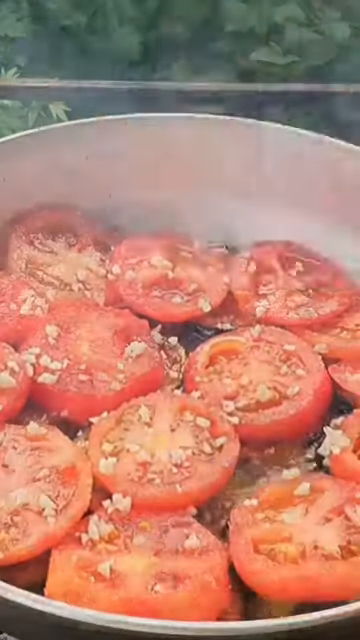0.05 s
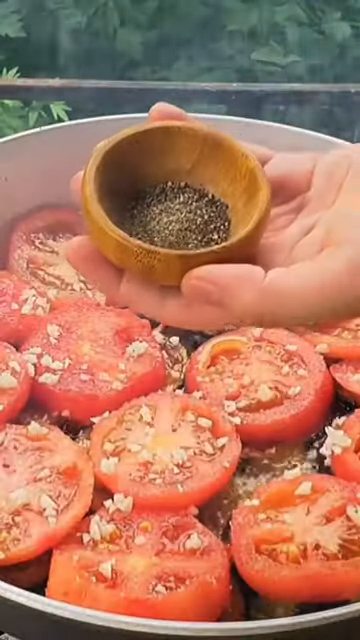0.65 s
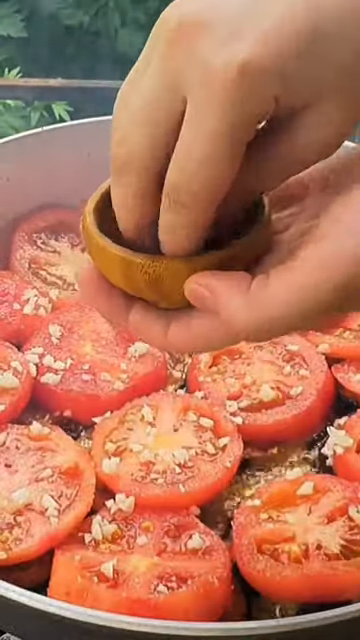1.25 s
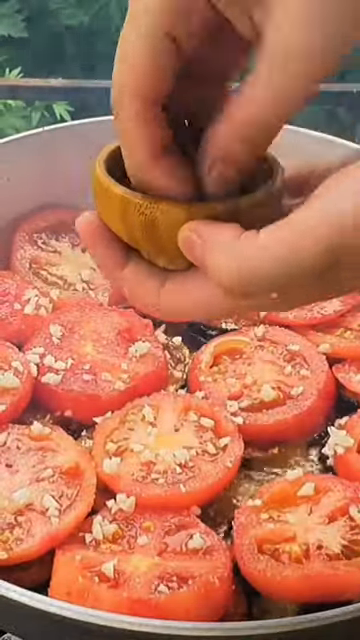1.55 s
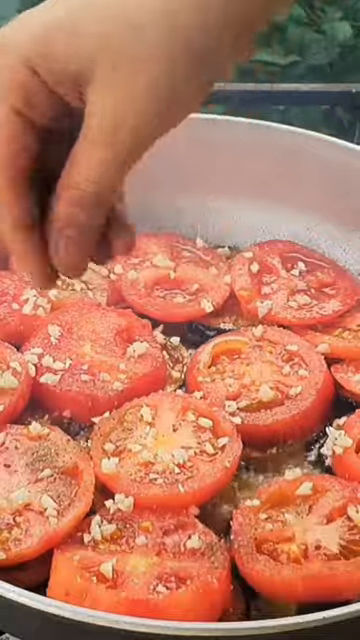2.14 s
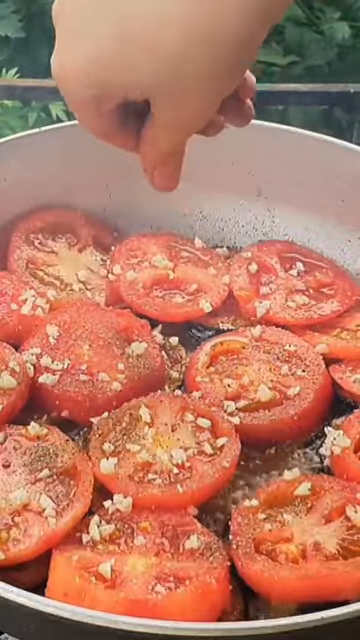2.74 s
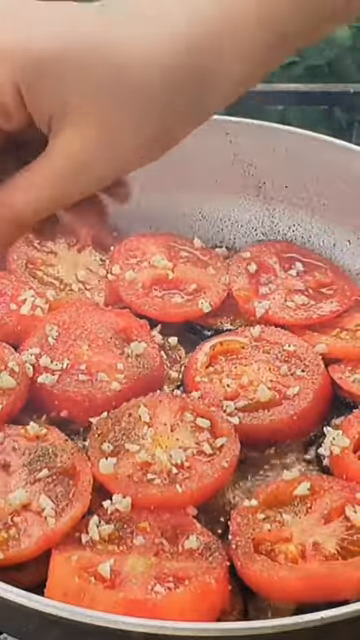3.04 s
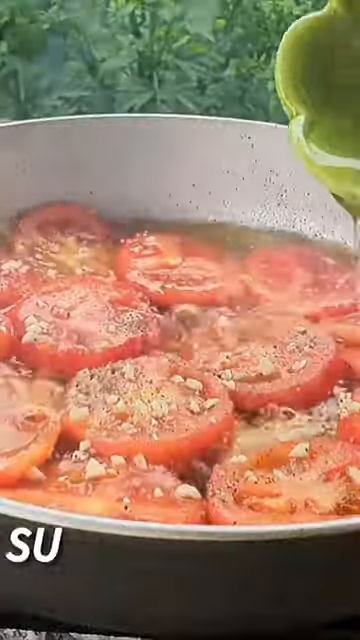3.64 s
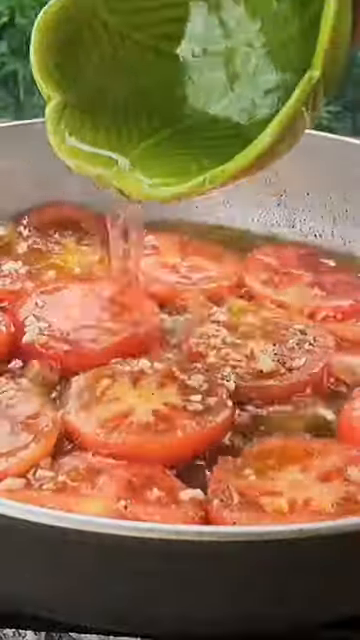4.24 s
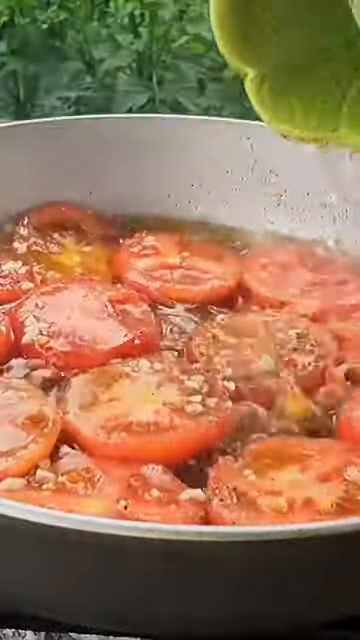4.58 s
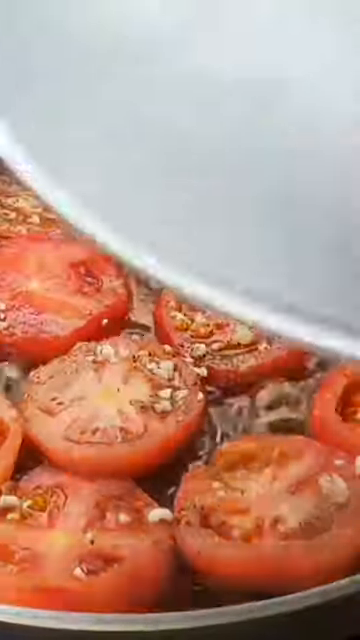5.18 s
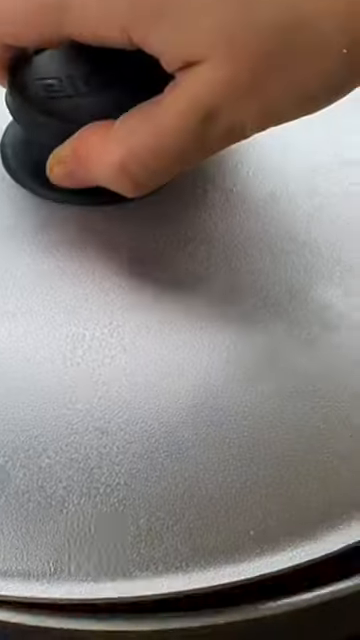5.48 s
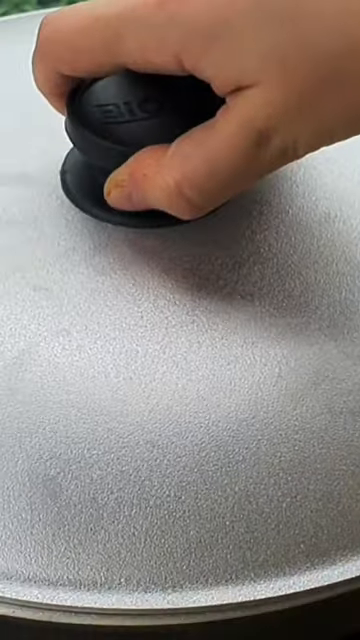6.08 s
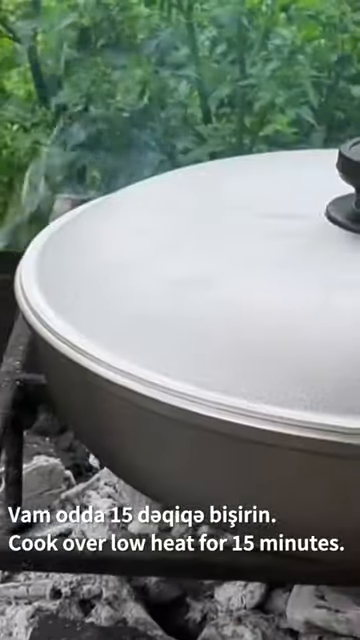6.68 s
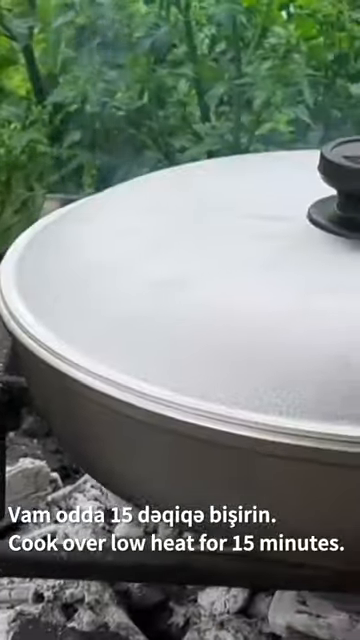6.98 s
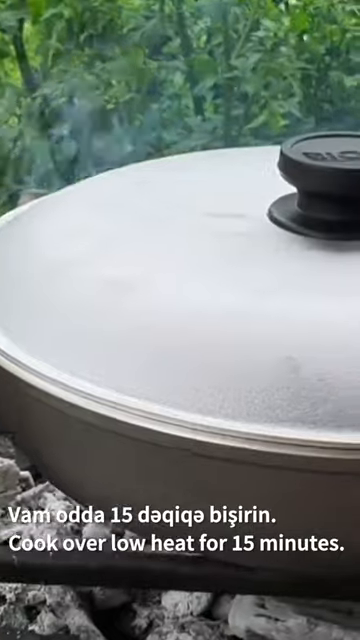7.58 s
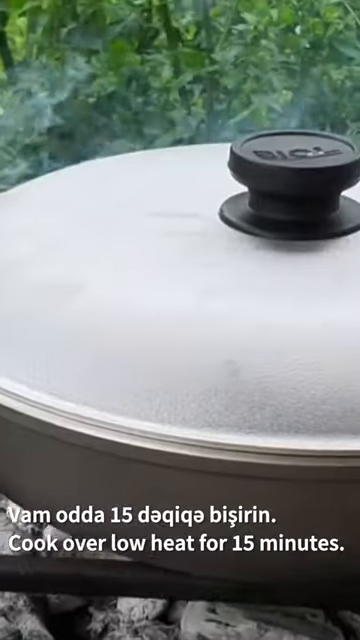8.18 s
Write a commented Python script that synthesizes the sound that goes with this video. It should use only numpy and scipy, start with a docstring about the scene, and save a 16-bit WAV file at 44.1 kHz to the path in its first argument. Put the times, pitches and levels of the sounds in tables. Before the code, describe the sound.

Tomato slices sizzle and pop loudly in hot oil, close to the microphone. Water is poured in and boils up with a hissing roar, then settles to a soft, spitting simmer. A metal lid knocks on the rim, scrapes across and drops into place with a thin ring. Muffled bubbling continues quietly under it, with faint birds, insects and a low rumble of air in the garden.

```python
"""Tomato slices fry in a wide pan over embers in a garden: steam bubbles burst in the hot oil.
Water is poured in and boils up with a roar, then the pan calms to a simmer.
A metal lid knocks on the rim, slides across and drops into place; the sauce bubbles under it.
Behind it, birds call, insects rub their wings and a draught rumbles around the fire."""
import sys
import numpy as np
from scipy import signal
from scipy.fft import rfft, irfft, next_fast_len
from scipy.io import wavfile
from scipy.ndimage import map_coordinates

SR = 44100
rng = np.random.default_rng(int(sys.argv[2]) if len(sys.argv) > 2 else 0)


def generate_wav(signal):
    """Clip the signal to [-1, 1] and save it as 16-bit WAV at the path in sys.argv[1]."""
    frames = np.transpose(np.atleast_2d(signal))
    scaled = np.clip(frames, -1, 1) * 32767
    pcm = np.round(scaled).astype(np.int16)
    wavfile.write(sys.argv[1], SR, pcm)


N = 366912

TOP_HZ = 15700  # upper edge of the sound
LID_SHUT_S = 6.03
# the gritty tone of lid against rim: (frequency [Hz], level [dB])
GRIT_TONE = [(500, -19.5), (1080, 7), (1350, 2.5), (1900, -2), (2500, 6.5), (3100, -9.5), (4300, -9.5),
             (6500, -9), (8000, -14), (12000, -18), (15600, -27)]


def frying():
    """Juice flashes to steam in the oil: dry ticks, wet ringing bubbles, a fine fizz and loud pops."""
    # the largest steam bubbles bursting: (time [s], level [dB])
    big_pops = [(0.0742, -6.5), (0.2349, -4), (0.4923, -4), (0.5676, -1), (0.637, -1), (1.076, 1.5),
                (1.2565, -0.5), (1.4385, 0.5), (1.5713, 2), (1.6928, -0.5), (1.923, 1), (2.0213, -1.5),
                (2.346, -3), (2.362, -0.5)]
    # the tone of sizzling oil: (frequency [Hz], level [dB])
    oil_tone = [(150, -27.5), (280, -23.5), (450, -26), (560, -16), (660, -12), (850, -14), (1100, -14),
                (1500, -11.5), (1900, -6.5), (2500, -4), (3400, 0), (5000, -5.5), (7500, -6.5),
                (11000, -12), (15600, -16)]
    t = np.arange(N) / SR
    build_s, end_s, flurry_s, pop_hz = 0.72, 3.035, 0.028, 3397
    # the sizzle builds up, then holds until the water comes
    heat = amp(-15.5 - 3.5 * np.maximum(1 - t / build_s, 0)) * held(0, end_s, fall_s=0.54)
    clumps = amp(1.2 * wobble(260) + 0.85 * wobble(45.1) + 0.39 * wobble(14))
    ticks = bubbles(0, 3.3, count=9000, life_s=0.00021, spread_db=4)
    wet = bubbles(0, 3.3, count=1500, life_s=0.0038, spread_db=3, high_hz=5203, samples=480)
    sizzle = colour(clumps * (ticks + amp(-6.5) * wet + noise()), oil_tone)
    soft_pops = scattered(0, end_s, count=20, db=-7.5, spread_db=3)
    all_pops = [(s, db, pop_hz * np.exp(rng.normal(0, 0.063))) for s, db in [*big_pops, *soft_pops]]
    pops = bursts(all_pops, ring_s=0.016, spray_db=-10, spray_s=0.018, spray_width_hz=4200)
    # each big pop sets off a flurry of small bubbles
    flurries = sum((t > s) * np.exp(-np.abs(t - s) / flurry_s) for s, _ in big_pops)
    small = bubbles(0, 3.3, count=1400, life_s=0.005, spread_db=2.5, low_hz=1793, high_hz=4730,
                    samples=480)
    spatter = amp(-2.8) * heat * flurries * unit(small) + amp(-2) * pops
    # the pops and flurries carry no bass
    return heat * sizzle + filtered(spatter, lambda hz: 1 - 1 / (1 + (hz / 900) ** 4))


def pouring():
    """Water meets hot oil: a dense boil makes the pan hum, under a hiss of bursting steam bubbles."""
    # the tones of the boil and the steam: (frequency [Hz], level [dB])
    boil_tone = [(41, -47), (70, -26.5), (102, 1.5), (171, -13.5), (253, -2), (308, -0.5), (436, 0),
                 (677, -8), (741, 0), (930, 1.5), (2240, 0.5), (2600, 4), (3380, -43), (5720, -120)]
    steam_tone = [(1500, -35), (2300, -13.5), (2750, -2), (3300, -2.5), (4300, -0.5), (5200, 0.5),
                  (6500, -2), (8000, -2), (10500, -6), (13000, -6), (15600, -5)]
    # where the pan, fine bubbles and coarse bubbles ring: (pitch [Hz], width [Hz], level [dB])
    pan_peaks = [(95, 30.3, -17), (211, 27, 3.5), (251, 24.3, 9), (444, 185, 7), (947, 90, 1),
                 (1140, 210, 6), (1620, 260, 3)]
    fine_peaks = [(5330, 1500, 0)]
    coarse_peaks = [(1170, 340, -4.5), (2820, 420, 1.5)]
    t = np.arange(N) / SR
    full_s, end_s, trickle_s = 3.226, 4.887, 0.14
    # the steam weakens as the pan cools; it dies with the boil as the stream of water thins out
    flow = np.clip((end_s - t) / trickle_s, 0, 1)
    boil_gain = amp(-21) * flow * held(full_s, end_s, rise_s=0.48)
    steam_gain = amp(-9.5) * flow ** 1.25 * held(full_s, end_s, rise_s=0.6, sag_db_per_s=2.5)
    rolling = bubbles(3, 5, count=1600, life_s=0.0044, spread_db=1.5, high_hz=3190, samples=600)
    froth = bubbles(3, 5, count=4000, life_s=0.0057, spread_db=2, samples=400) + amp(3) * noise()
    boil = amp(-1.5) * colour(rolling + amp(6.5) * noise(), boil_tone)
    boil += amp(-1) * resonate(noise(), pan_peaks)
    # as the water floods and cools the pan, the bubbles grow and the hiss deepens
    flood = np.interp(t, [3.3, 4.1], [0, 1])
    fine = amp(-8.5) * (1 - flood) * resonate(noise(), fine_peaks)
    coarse = amp(-9.5) * flood * resonate(noise(), coarse_peaks)
    steam = (colour(froth, steam_tone) + fine + coarse) * amp(0.97 * wobble(60))
    return boil_gain * boil * amp(0.85 * wobble(35)) + steam_gain * steam


def simmering():
    """The cooled pan ticks and spits softly; the lid coming down makes the bubbling sound hollow."""
    # the tone of simmering sauce: (frequency [Hz], level [dB])
    sauce_tone = [(53, -39), (90, 0), (237, -9), (270, -4), (434, -21), (493, -10.5), (727, -15),
                  (1030, -9.5), (1720, -14.5), (3430, -21.5), (12500, -28), (15500, -33)]
    # where the gap under the lid rings: (pitch [Hz], width [Hz], level [dB])
    gap_peaks = [(1710, 130, 0)]
    # the loudest spitting droplets: (time [s], level [dB], pitch [Hz])
    droplets = [(4.9776, -21.5, 1490), (5.007, -14, 1700), (5.0579, -13.5, 1750), (5.1515, -18.5, 1410),
                (5.1871, -21.5, 2130), (5.3128, -20.5, 1740), (5.3655, -26, 1750), (5.4086, -22, 1730),
                (5.49, -24.5, 1660)]
    ticks = bubbles(4.8, 6.5, count=1100, life_s=0.00091, spread_db=2.6)
    plips = bubbles(4.8, 5.1, count=160, life_s=0.005, spread_db=4, low_hz=1106, high_hz=6500,
                    samples=700)
    open_pan = held(4.88, LID_SHUT_S, rise_s=0.1, fall_s=0.19, sag_db_per_s=3.5)
    leak = amp(-16.5) * held(LID_SHUT_S, 6.27, rise_s=0.1, fall_s=0.82)
    simmer = (open_pan + leak) * colour(ticks + amp(-3) * plips + amp(-1) * noise(), sauce_tone)
    lid_near = held(5.5, 5.68, rise_s=0.55, fall_s=0.45)
    hollow = lid_near * resonate(noise() * amp(3.2 * wobble(90)), gap_peaks)
    spits = bursts(droplets, ring_s=0.012, spray_db=-4.5, spray_s=0.018, spray_width_hz=1800)
    return amp(-38) * simmer + amp(-37.5) * hollow + spits


def lid_knocks():
    """The lid knocks on the rim, drops into place with a thin ring, then rattles softly."""
    # lid hits rim: (time [s], strength [dB], plate ring offset [dB], hollow ring offset [dB])
    knocks = [(5.573, -4, 1, -13), (5.597, -4, -9, 0.5), (5.608, -6.5, -0.5, -7.5), (5.687, -6, 8, -2.5),
              (5.928, -9.5, -1, -8), (5.948, 3, -5, -7.5), (5.962, 0, -4.5, 3), (5.977, -3, -7.5, 7),
              (6.032, -12, 1.5, 3.5)]
    # the ringing lid, its rim and the air under it: (pitch [Hz], level [dB], time to fade 60 dB [s])
    plate_tones = [(635, 1.5, 0.1), (907, -9, 0.065), (1070, -10.5, 0.12), (1530, -2.5, 0.083),
                   (1630, -3.5, 0.05), (1870, -9.5, .06), (2030, -22, .2), (2340, -15.5, 0.064),
                   (2480, -15, 0.14), (2720, -15, .07), (3210, -9, 0.059), (3800, -3, .05),
                   (4683, -9.5, .06), (5335, -17, 0.068), (5850, -14, 0.086), (6400, -8, 0.052),
                   (6880, -17, 0.093)]
    rim_tones = [(3700, 2, 0.33), (5050, 1.5, 0.3), (6740, -4.5, .16), (8200, -14.5, .18), (9360, -10, .14)]
    hollow_tones = [(109, -17.5, 0.48), (178.5, -11, .2), (270, -8, 0.26), (312.6, -11, 0.32),
                    (400, -3.5, 0.12), (451, -3, 0.064), (512, 2, 0.079)]
    out, t = np.zeros((2, N)), np.arange(SR // 2) / SR
    rattles = [(s, db, 16.5, 1) for s, db in scattered(6.15, 6.37, count=7, db=-43.5, spread_db=1)]
    for s, db, plate_db, hollow_db in [*knocks, *rattles]:
        crack = colour(noise(len(t)), GRIT_TONE) * amp(-9.5 - 60 * t / 0.045)
        plate = amp(plate_db - 14) * ringing(plate_tones, t)
        hollow = amp(hollow_db - 14) * ringing(hollow_tones, t)
        muted_rim = amp(-36.5) * ringing(rim_tones, t)
        add(out, s, amp(db) * (crack + plate + hollow + muted_rim))
    # the rim rings freely only as the lid drops into place
    add(out, 5.962, amp(-18.5) * ringing(rim_tones, t))
    return out


def lid_slide():
    """The lid scrapes across the rim, which makes the plate and the air in the opening groan."""
    # short shoves of the lid: (time [s], length [s], groan level [dB], grit level [dB])
    shoves = [(5.779, 0.048, -28.5, -44.5), (5.845, 0.032, -20.5, -35), (5.906, 0.077, -12.5, -24.5),
              (6.02, 0.026, -21, -26.5), (6.152, .2, -39, -56)]
    # the air's note sinks as the opening closes: (time [s], pitch [Hz])
    air_pitch = [(5.81, 632), (5.911, 505.7), (5.99, 475.5), (6.04, 348)]
    # where the rubbed plate rings: (pitch [Hz], width [Hz], level [dB])
    plate_peaks = [(266, 41, -1.5), (437, 49, 4), (506, 54, 5), (1466, 90, -5), (2060, 32, -13),
                   (2270, 84, -16)]
    groan_gain, grit_gain = sum(
        amp([[groan_db], [grit_db]]) * held(s, s + length, rise_s=0.063, fall_s=0.095)
        for s, length, groan_db, grit_db in shoves)
    air_hz = np.interp(np.arange(N) / SR, *np.transpose(air_pitch))
    phase = 2 * np.pi * np.cumsum(air_hz) / SR
    air = unit(wobble(110) * np.cos(phase) + wobble(110) * np.sin(phase))  # an uneven tone
    groan = amp(-2.5) * air + amp(-4) * resonate(noise(), plate_peaks)
    # the rim catches and slips, so the grit comes in tiny spurts
    grit = colour(noise() * amp(3.8 * wobble(300)), GRIT_TONE)
    return groan_gain * groan + grit_gain * grit


def covered_sauce():
    """Thick bubbles thud under the lid and make the trapped air ring."""
    # the loudest thick bubbles: (time [s], level [dB], trapped air offset [dB])
    big_blubs = [(6.546, -30, -9), (6.721, -27, -7), (6.801, -30, -11), (6.961, -21, -18), (7.044, -35, -3),
                 (7.268, -26, -22), (7.371, -26.5, -7), (7.719, -27, -19), (8.078, -21.5, -19),
                 (8.198, -26.5, -5.5)]
    # the tone of a thud: (frequency [Hz], level [dB])
    thud_tone = [(53, -33), (90, -1.5), (172, -2), (214, 1), (351, -8), (399, -3), (530, -21.5),
                 (603, -19.5), (800, -24.5), (1040, -58), (1760, -120)]
    # where the trapped air rings: (pitch [Hz], width [Hz], level [dB])
    air_peaks = [(950, 56, 4), (1430, 31, -6)]
    pushes, t = np.zeros((2, N)), np.arange(SR // 5) / SR
    swell = (1 - np.exp(-t / 0.0028)) * amp(-60 * t / 0.15)
    soft_blubs = [(s, db, rng.normal(-13, 3))
                  for s, db in scattered(LID_SHUT_S, N / SR, count=11, db=-30.5, spread_db=3)]
    for s, db, air_db in [*big_blubs, *soft_blubs]:
        add(pushes, s, amp([[db], [db + air_db]]) * swell)
    thud_push, air_push = pushes
    bubbling = amp(-40.5) * held(LID_SHUT_S, N / SR, rise_s=0.06)
    bubbling += amp(-44) * held(7.75, 7.98, rise_s=0.4)  # livelier once the heat has built up
    bubbling *= amp(2.3 * wobble(22))
    thud = (amp(-3.5) * bubbling + amp(-12) * thud_push) * colour(noise(), thud_tone)
    air = (amp(-12.5) * bubbling + amp(-7) * air_push) * resonate(noise(), air_peaks)
    return thud + filtered(air, lambda hz: 1 / (1 + (hz / 1900) ** 6))


def birds():
    """Three far birds chirp, rasp and whistle; echoes from the trees smear their notes."""
    # the rasping bird: (time [s], starting pitch [Hz], level [dB])
    rasps = [(6.42, 2900, -57), (6.62, 2950, -56.5), (6.85, 2750, -57), (7.07, 3800, -54),
             (7.28, 3620, -57), (7.75, 3630, -51), (7.95, 3500, -62)]
    # the whistling bird: (time [s], length [s], starting pitch [Hz], level [dB])
    whistles = [(7.04, 0.37, 2340, -58), (7.6, .19, 1975, -48), (7.72, 0.151, 2276, -43.5),
                (7.86, 0.078, 1853, -49.5)]
    # the echo among the trees: (frequency [Hz], time to fade 60 dB [s])
    echo_times = [(500, 1.0), (2500, 1.15), (8000, .6)]
    song = np.zeros((2, N))
    for k in range(3):  # a high chirp at an even pace
        add(song, 6.8 + k * 0.635, bird_note(0.15, start_hz=5120, fall=0.0464, db=-51, rasp=0.26))
    for s, hz, db in rasps:
        add(song, s, bird_note(0.17, hz, fall=0.12, db=db, rasp=0.85))
    for s, length, hz, db in whistles:
        add(song, s, bird_note(length, hz, fall=0.025, db=db, rasp=0.15))
    hz, t, bands = signal.stft(rng.standard_normal((2, SR)), SR, nperseg=256)
    fade = amp(-60 * t / along(echo_times, hz)[:, None])
    _, tail = signal.istft(bands * fade, SR, nperseg=256)
    echo = signal.fftconvolve(song, tail / np.linalg.norm(tail[0]), axes=1)[:, :N]
    return amp(-5) * song + amp(7.5) * echo


def bird_note(length_s, start_hz, fall, db, rasp):
    """A note swells, fades and falls by a share of its pitch; more rasp makes it waver more."""
    progress = np.linspace(0, 1, int(length_s * SR))
    waver = np.interp(progress * length_s * 260, np.arange(600), rng.standard_normal(600))
    hz = start_hz * (1 - fall * progress) * (1 + 0.106 * rasp * waver)
    return amp(db) * np.sin(np.pi * progress) * np.sin(2 * np.pi * np.cumsum(hz) / SR)


def insects():
    """Katydids buzz; one group of crickets starts up and tires, then a higher one joins in."""
    katydids = amp(-47) * held(5.45, 6.26, rise_s=2.8, fall_s=0.4) * wings(12230, width_hz=600)
    crickets = amp(-51.5) * held(6.39, 9.1, rise_s=0.28, sag_db_per_s=7) * wings(7320, width_hz=450)
    higher_crickets = amp(-49.5) * held(7.82, 8.32, rise_s=2) * wings(7420, width_hz=530)
    return katydids + crickets + higher_crickets


def wings(centre_hz, width_hz):
    """Many rubbing wings blend into one narrow, lightly fluttering hiss."""
    band = unit(filtered(noise(), lambda hz: np.exp(-((hz - centre_hz) / width_hz) ** 2)))
    return band * amp(wobble(50))


def garden_air():
    """A draught rumbles around the fire, over the faint hush of open air."""
    # spells of draught: (start [s], end [s], level [dB])
    draughts = [(0, 0.44, -47), (.55, 3.3, -45), (3.3, 6.3, -56), (6.36, 7.1, -42), (7.1, 8.32, -45.5)]
    # the tones of the draught and the open air: (frequency [Hz], level [dB])
    rumble_tone = [(12, -36), (20, -18), (70, 3.5), (91, 3), (113, -13), (130, -1.5), (170, -33),
                   (290, -120)]
    hush_tone = [(200, 1), (600, -8), (1300, -10), (2000, -11), (3000, -8.5), (4300, -10), (5800, -14),
                 (8000, -23.5), (9000, -43.5), (12000, -22.5), (15000, -27)]
    spells = [amp(db) * held(start, end, rise_s=0.4, fall_s=6) for start, end, db in draughts]
    rumble = np.max(spells, axis=0) * colour(noise(), rumble_tone) * amp(1.9 * wobble(9.3))
    return rumble + amp(-54.5) * colour(noise(), hush_tone)


def bubbles(start_s, end_s, count, life_s, spread_db, low_hz=100, high_hz=TOP_HZ, samples=160):
    """Tiny bursts all over the pan: fading tones, each with its own delay to the left and right."""
    when, pitch, strength, life, place = rng.random((count, 5)).T[..., None]
    steps = np.arange(samples)
    fade_s = life_s * 10 ** (life - 1)
    hz = low_hz + (high_hz - low_hz) * pitch
    gain = amp(-spread_db * np.log(1 - 0.99 * strength)) / np.sqrt(fade_s)  # many weak, few strong
    starts = ((start_s + (end_s - start_s) * when) * SR).astype(int)
    pair = []
    for side in (-1, 1):
        delay_s = 0.00021 * (0.5 + side * (place - 0.5))
        t = np.maximum(steps / SR - delay_s, 0)
        rings = gain * np.exp(-t / fade_s) * np.sin(2 * np.pi * hz * t)
        pair.append(np.bincount((starts + steps).ravel(), rings.ravel(), N)[:N])
    return np.array(pair) / np.std(pair) * np.sqrt((end_s - start_s) * SR / N)


def bursts(rows, ring_s, spray_db, spray_s, spray_width_hz):
    """Each large bubble rings briefly and throws a puff of spray around its own pitch."""
    out, t = np.zeros((2, N)), np.arange(SR // 25) / SR
    for s, db, hz in rows:
        fade_s = ring_s * np.exp(rng.normal(0, 0.2))
        ring = np.sin(2 * np.pi * hz * t) * amp(-60 * t / fade_s)
        band = [(hz, spray_width_hz, 0)]
        spray = resonate(resonate(noise(len(t)), band), band) * amp(spray_db - 60 * t / spray_s)
        add(out, s + 0.0008, amp(db) * (ring + spray) * (1 - np.exp(-2 * hz * t)))
    return out


def ringing(tones, t):
    """A strike sets off fading tones at new strengths; high ones reach left and right out of step."""
    out = np.zeros((2, len(t)))
    for hz, db, fade_s in tones:
        skew = np.arccos(likeness(hz)) / 2 * rng.choice([-1, 1]) * np.array([[1], [-1]])
        gain = amp(db + rng.normal(0, 1.4) - 60 * t / fade_s)
        out += gain * np.sin(2 * np.pi * hz * t + skew + 2 * np.pi * rng.random())
    return out * (1 - np.exp(-t / 0.0003))


def held(start_s, end_s, rise_s=1, fall_s=1, sag_db_per_s=0):
    """Gain that climbs 60 dB in rise_s, holds or sags from start to end, then drops 60 dB in fall_s."""
    t = np.arange(N) / SR
    outside = np.maximum(start_s - t, 0) / rise_s + np.maximum(t - end_s, 0) / fall_s
    return amp(-60 * outside - sag_db_per_s * np.maximum(t - start_s, 0))


def scattered(start_s, end_s, count, db, spread_db):
    """Loosely spaced events of random strength: (time [s], level [dB])."""
    when, strength = rng.random((count, 2)).T
    times = start_s + (end_s - start_s) * (np.arange(count) + when) / count
    return np.column_stack([times, db + spread_db * (2 * strength - 1)])


def amp(db):
    """Turn decibels into a gain to multiply by."""
    return 10 ** (np.asarray(db) / 20)


def unit(x):
    """Scale so that the average of left and right has a level (rms) of 1."""
    return x / np.sqrt(np.mean(np.atleast_2d(x).mean(0) ** 2) + 1e-20)


def along(points, hz):
    """Read between (frequency [Hz], value) points, with octaves evenly spaced."""
    frequencies, values = np.transpose(points)
    return np.interp(np.log(hz + 1), np.log(frequencies + 1), values)


def wobble(rate):
    """A smooth curve through `rate` random values a second."""
    return map_coordinates(rng.standard_normal(int(N * rate / SR) + 4), [np.arange(N) * rate / SR])


def filtered(x, response):
    """Turn each frequency of x up or down by response(hz)."""
    size = x.shape[-1]
    padded = next_fast_len(size + 8192)
    return irfft(rfft(x, padded) * response(np.fft.rfftfreq(padded, 1 / SR)), padded)[..., :size]


def likeness(hz):
    """How alike left and right are at each frequency."""
    # left-right match: (frequency [Hz], likeness [1 = identical])
    match = [(60, 0.84), (200, 0.99), (1100, 0.86), (2400, 0.84), (6000, .05), (15000, 1)]
    return np.clip(along(match, hz), -0.5, 1)


def noise(size=N):
    """White stereo noise, nearly the same on both sides in the bass."""
    mid, side = filtered(rng.standard_normal((2, size)),
                         lambda hz: np.sqrt([(1 + likeness(hz)) / 2, (1 - likeness(hz)) / 2]))
    return np.array([mid + side, mid - side])


def colour(x, tone):
    """Shape a white stereo sound with a tone table, at level 1."""
    return unit(filtered(x, lambda hz: amp(along(tone, hz)) / np.sqrt((1 + likeness(hz)) / 2)))


def resonate(x, peaks):
    """Make x ring around a few pitches, at level 1."""
    return unit(filtered(x, lambda hz: sum(
        amp(db) * 1j * hz * width / (pitch ** 2 - hz ** 2 + 1j * hz * width)
        for pitch, width, db in peaks)))


def add(track, s, sound):
    """Mix a sound into the track, starting at s seconds."""
    part = track[:, max(round(s * SR), 0):][:, :sound.shape[-1]]
    part += sound[..., :part.shape[1]]


def scene():
    """The pan in front, the garden around it; the lid and quiet sounds sit a little to the right."""
    quiet = (covered_sauce() + birds() + insects() + garden_air()) * amp([[-0.75], [0.75]])
    pan = frying() + pouring() + simmering()
    lid = (lid_knocks() + lid_slide()) * amp([[-0.35], [0.35]])
    return pan + lid + quiet


def record(dry):
    """The loudest peaks are flattened, and everything above TOP_HZ is cut."""
    return filtered(np.clip(dry, -1, 1), lambda hz: hz < TOP_HZ)


dry = scene()
out = record(dry)
generate_wav(out)
```